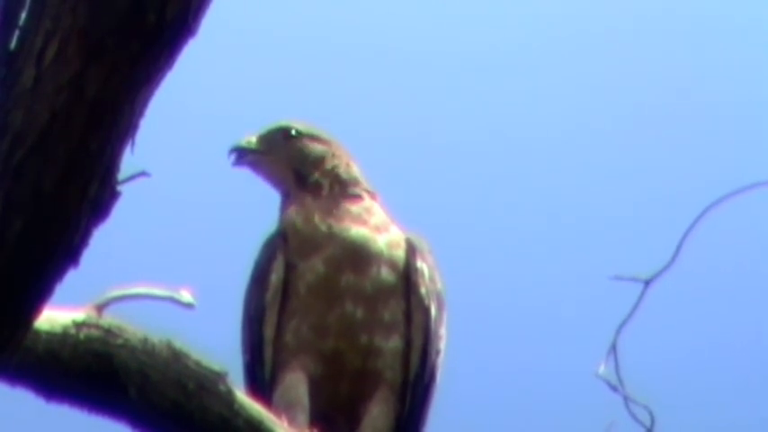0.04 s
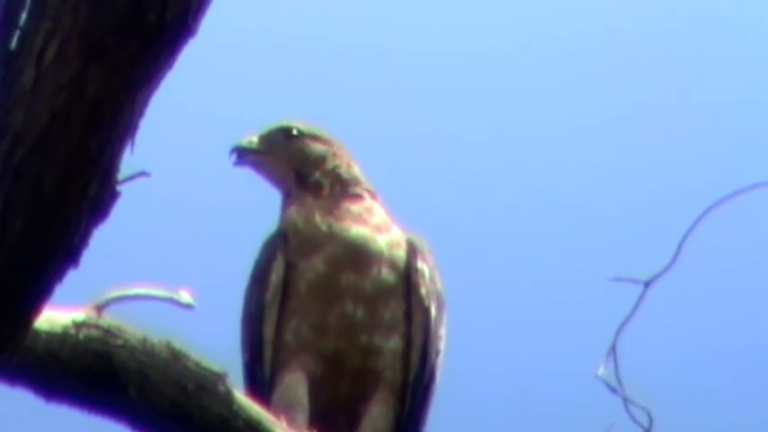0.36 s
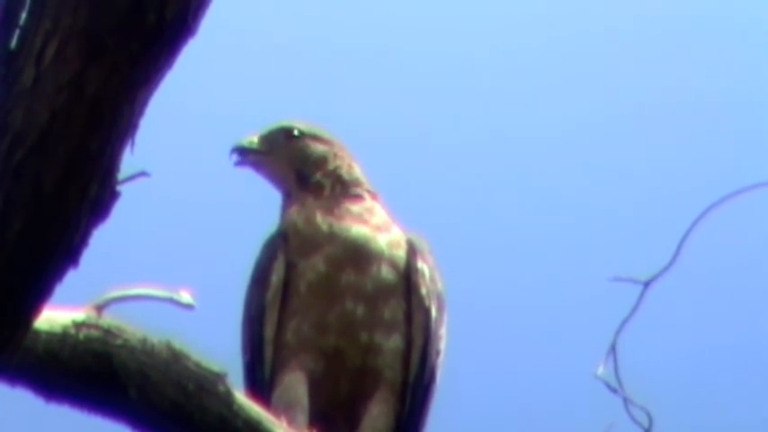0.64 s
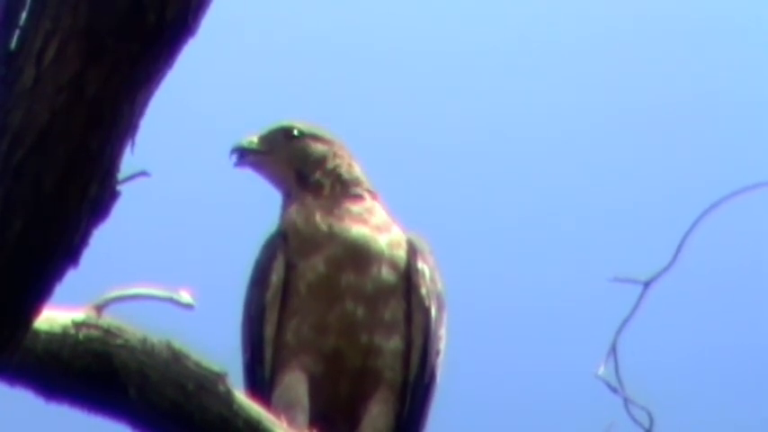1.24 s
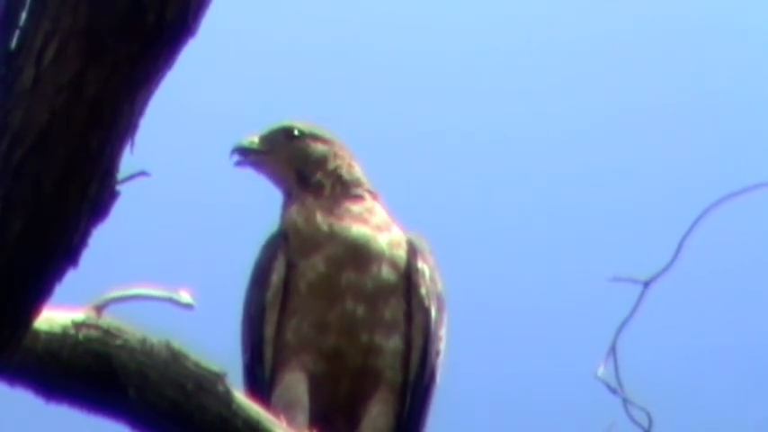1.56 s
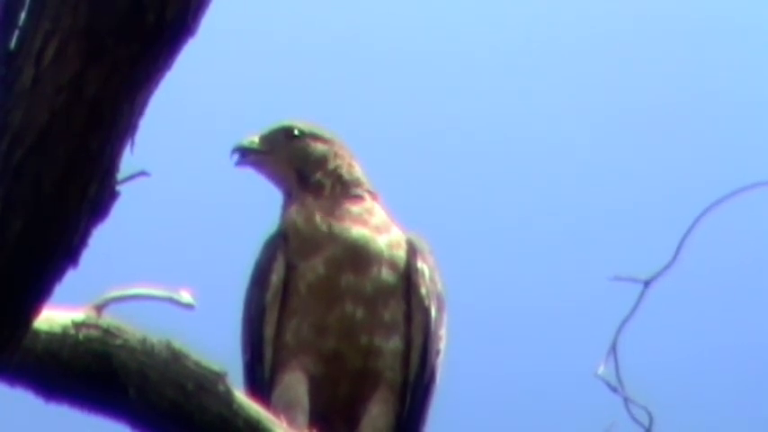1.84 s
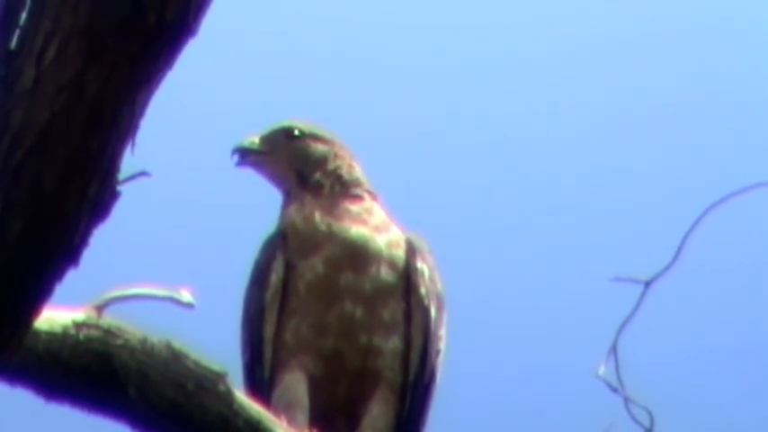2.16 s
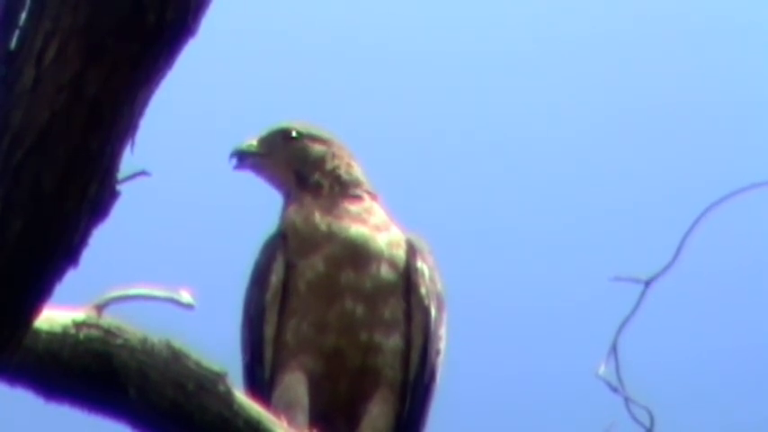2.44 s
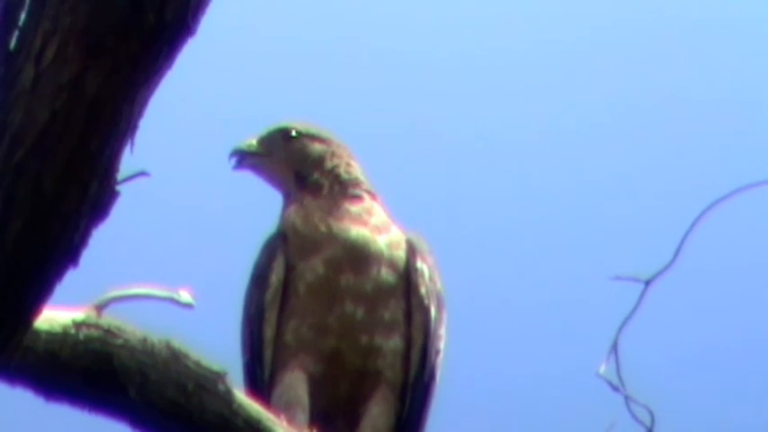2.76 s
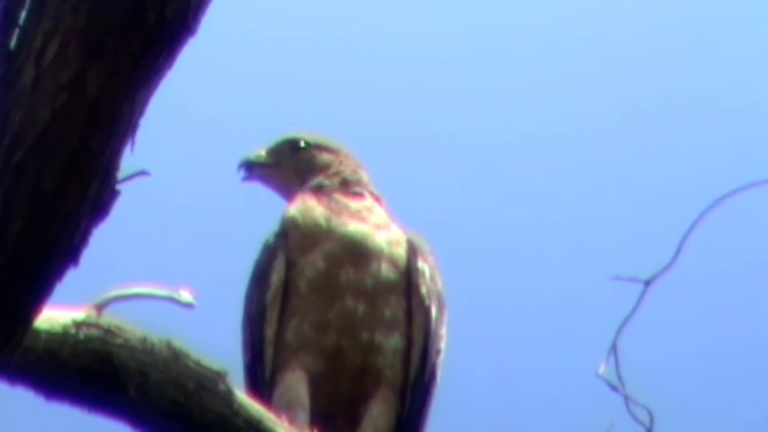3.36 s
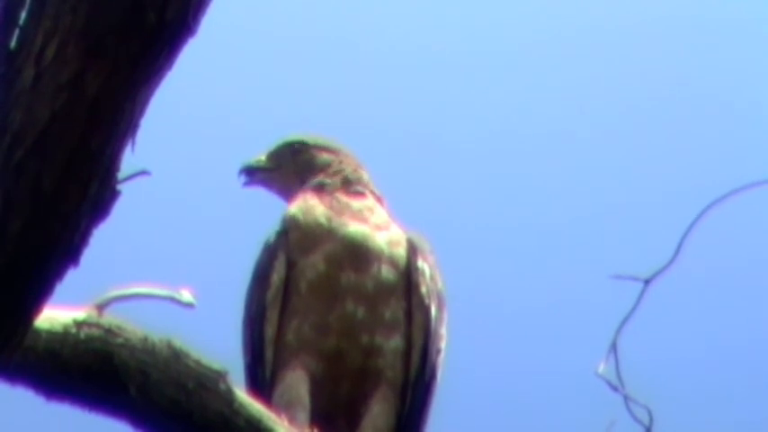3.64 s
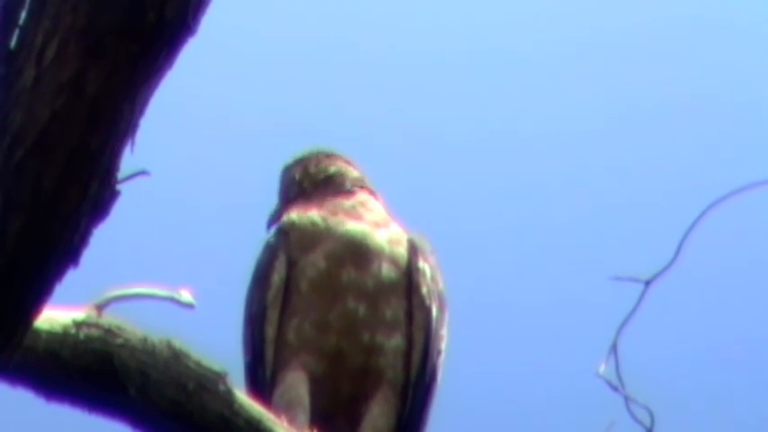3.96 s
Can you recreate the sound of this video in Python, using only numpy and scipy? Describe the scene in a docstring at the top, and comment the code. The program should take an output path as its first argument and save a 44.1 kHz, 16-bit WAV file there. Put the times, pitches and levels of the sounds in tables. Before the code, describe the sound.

Insects hiss high and steady throughout, with a thin cricket trill and low distant rumble. In the first half second a bird gives a rising whistle, with a thin buzzing one above it. Faint calls echo among the trees. From about 2 to 3 seconds a bird repeats six very high falling chirps. Something dry crackles close by just before 3 seconds, and two more chirps come near 4.

```python
"""Summer woodland. All along, insects hiss high up and one cricket trills over a low, distant rumble.
At the start a bird draws a long rising whistle, with a thin buzzing one far above it, and other birds
begin to call far off among the echoing trees. From about two seconds a bird repeats a very high falling
chirp. Near three seconds something dry crackles close by, and two more chirps come just before the end."""
import sys
import numpy as np
from scipy import signal
from scipy.io import wavfile

SR = 44100
rng = np.random.default_rng(int(sys.argv[2]) if len(sys.argv) > 2 else 0)


def bounce(signal):
    """Save signal as a 16-bit WAV file at the path given by the first command-line argument."""
    frames = np.transpose(np.atleast_2d(signal))
    limited = np.clip(frames, -1, 1)
    pcm = np.round(limited * 32767).astype(np.int16)
    wavfile.write(sys.argv[1], SR, pcm)


N = 176400
TIME = np.arange(N) / SR


def from_db(db):
    """Turn decibels into a number to multiply a sound by."""
    return 10 ** (np.asarray(db) / 20)


def rms_one(x):
    """Scale a sound so that its average power is 1."""
    return x / np.sqrt(np.mean(x ** 2) + 1e-20)


def pan(db):
    """Left and right gains that make the left side louder by db."""
    return from_db(np.array([[db], [-db]]) / 2)


def in_time(rows):
    """Join a table's rows by straight lines: one curve for each column after the time."""
    times, *columns = np.transpose(rows)
    return [np.interp(TIME, times, column) for column in columns]


def at_hz(points, hz):
    """Read a table at one frequency, with all octaves equally wide."""
    freqs, values = np.transpose(points)
    return np.interp(np.log(hz), np.log(freqs), values)


def drift(rate_hz):
    """A smooth random wobble of typical size 1; a higher rate wobbles faster."""
    r = np.exp(-2 * np.pi * rate_hz / SR)
    return rms_one(signal.lfilter([1], [1, -2 * r, r * r], rng.standard_normal(N + SR))[SR:])


def stereo(pair, alike):
    """Mix two noises into left and right: alike is 0 for unrelated sides, 1 for equal ones."""
    alike = np.clip(alike, -1, 1)
    return np.sqrt(1 + alike) * pair[0] + np.sqrt(1 - alike) * pair[1] * np.array([[1], [-1]])


def resonant_noise(hz, width_hz):
    """Two unrelated noises, each passed twice through a filter that rings at one pitch."""
    r = np.exp(-np.pi * width_hz / SR)
    section = [1 - r, 0, r - 1, 1, -2 * r * np.cos(2 * np.pi * hz / SR), r * r]
    return rms_one(signal.sosfilt([section, section], rng.standard_normal((2, N + SR)))[:, SR:])


def banded_noise(spectrum, likeness, flicker_db):
    """Stereo noise in half-octave bands, each with its own level and flicker."""
    edges = 20 * 2 ** np.arange(0, 10.1, .5)
    white = rng.standard_normal((2, 2, N))
    out = 0
    for k, (low, high) in enumerate(zip(edges, edges[1:])):
        pair = signal.sosfilt(signal.butter(2, [low, high], "band", fs=SR, output="sos"), white[k % 2])
        hz = np.sqrt(low * high)
        gain = from_db(at_hz(spectrum, hz) + flicker_db * drift(5))
        out = out + gain * stereo(pair, at_hz(likeness, hz))
    return rms_one(out)


def woods(x, echo_db, alike):
    """A sound plus quick echoes off nearby leaves and a dying cloud of echoes from the trunks."""
    t = TIME[:SR]
    first_echo_s, die_away_s, leaf_decay_s = 0.011, 0.94, 0.0069
    trunks = from_db(-60 * t / die_away_s) * (t > first_echo_s)
    leaves = from_db(7.5) * np.exp(-t / leaf_decay_s)
    echoes = stereo(rng.standard_normal((2, SR)), alike) * (trunks + leaves)
    echoes /= np.sqrt(np.sum(echoes ** 2) / 2)
    return x + from_db(echo_db) * signal.fftconvolve(x[None], echoes, axes=1)[:, :N]


def tone(hz):
    """A pure tone of power 1 that follows a pitch curve."""
    return np.sqrt(2) * np.sin(2 * np.pi * np.cumsum(hz) / SR)


def note(start, length, from_hz, to_hz, db, quaver, bend=1, growth=0):
    """One sliding bird note. A bend above 1 delays the slide; growth above 0 builds up the quaver."""
    attack_s, release_s = 0.014, 0.004
    span = (TIME >= start) & (TIME < start + length)
    t = TIME[span] - start
    slide_hz = from_hz + (to_hz - from_hz) * (t / length) ** bend
    hz = slide_hz * (1 + quaver[span] * (t / length) ** growth)
    fade = np.minimum(t / attack_s, 1) * np.minimum((length - t) / release_s, 1)
    out = np.zeros(N)
    out[span] = from_db(db) * tone(hz) * fade
    return out


def pulsing(per_s, depth, unsteady):
    """The slightly uneven throb in loudness that wing strokes make."""
    rate = per_s * (1 + unsteady * drift(9.48))
    return 1 + depth * np.sin(2 * np.pi * np.cumsum(rate) / SR)


def background():
    """Distant rumble and faint air, a few wavering hums and a dull drone that swells."""
    # tone colour of the rumble and air: f/Hz, relative level/dB
    air_colour = [(20, -2), (45, -4.5), (85, 2), (125, -5), (190, 0), (300, -6), (450, -8), (1000, -14),
                  (2500, -15.5), (5500, -17), (11000, -23), (16000, -34.5)]
    # how alike left and right are: f/Hz, likeness (0 to 1)
    likeness = [(60, 0.97), (150, 0.98), (260, 0.84), (500, 0.05), (1200, 0.067), (3000, 0.21),
                (12000, 0.93)]
    # faint far-off hums: f/Hz, level/dB, width/Hz
    hum_bands = [(84, -71.5, 9), (162.4, -61.5, 7.2), (722, -89.5, 30), (1257.5, -74, 11)]
    # loudness of the far-off drone: t/s, level/dB
    drone_swell = [(0, -71), (1, -67.5), (2.3, -60), (3, -61), (4, -61)]
    hums = sum(from_db(db) * resonant_noise(hz, width_hz)[0] for hz, db, width_hz in hum_bands)
    drone = rms_one(stereo(resonant_noise(hz=249, width_hz=116), alike=1.0))
    air = from_db(-52.5) * banded_noise(air_colour, likeness, flicker_db=1.0)
    return air + hums + from_db(in_time(drone_swell)[0]) * drone


def insects():
    """The rasping wings of many insects blend into a few throbbing bands of hiss."""
    # insect groups: f/Hz, width/Hz, level before the swell/dB, pulse rate/Hz, left over right/dB
    groups = [(7170, 520, -51, 56, -1), (7612, 500, -51, 97, -2), (7700, 84, -59, 41, 3),
              (8970, 1060, -57, 70, -1), (14600, 1500, -64, 90, 0)]
    # swell of the whole chorus: t/s, added level/dB
    swell = [(0, 1), (1.3, -.5), (2.3, 2.5), (3.3, 0.5), (4, 0.5)]
    chorus = 0
    for hz, width_hz, db, per_s, pan_db in groups:
        hiss = stereo(resonant_noise(hz, width_hz), alike=0.86)
        rasp = rms_one(hiss * pulsing(per_s, depth=0.16, unsteady=.15))
        chorus = chorus + rasp * pan(pan_db) * from_db(db + 0.1 * drift(8))
    return chorus * from_db(in_time(swell)[0])


def cricket():
    """One cricket's wing strokes make a thin, pulsing tone below the chorus."""
    # loudness of the trill: t/s, level/dB
    loudness = [(0, -65), (.55, -65), (.75, -62.5), (1.35, -62.5), (1.7, -64), (2.1, -60.5), (2.4, -60),
                (2.8, -62.5), (3.35, -61), (4, -64)]
    pitch_hz, waver_hz = 4845, 30.3
    trill = tone(pitch_hz + waver_hz * drift(60)) * pulsing(per_s=29, depth=0.37, unsteady=0.184)
    echoing = rms_one(woods(trill, echo_db=2.5, alike=0.91))
    return from_db(in_time(loudness)[0]) * pan(3) * echoing


def rising_whistle():
    """A bird's long rising whistle, which gets brighter as it gets louder."""
    # path of the whistle: t/s, f/Hz, level/dB
    path = [(0, 1500, -64), (.06, 1597, -58.5), (.13, 1705, -58), (.2, 1856, -52.5), (.27, 1917, -54),
            (.35, 1928, -55.5), (.47, 1926, -55), (.56, 1893, -61), (.6, 1890, -82)]
    # the tones in it: multiple of the pitch, added level/dB
    partials = [(1, -10), (2, -0.5), (3, -10)]
    hz, db = in_time(path)
    hz = hz * (1 + .011 * drift(180))
    dulling_db = 0.36 * (db - db.max())  # only the top tone loses this much in quiet moments
    voice = 0
    for multiple, partial_db in partials:
        voice = voice + from_db(db + partial_db + dulling_db * (multiple > 2)) * tone(multiple * hz)
    return woods(voice * (TIME < path[-1][0]), echo_db=-2, alike=0.65)


def thin_whistle():
    """A very high, level whistle that buzzes because its pitch shakes quickly."""
    # loudness of the whistle: t/s, level/dB
    loudness = [(0, -66), (.06, -57.5), (.22, -59.5), (.255, -48.5), (.32, -51.5), (.4, -61), (.5, -64),
                (.54, -72), (.62, -88)]
    pitch_hz, waver_hz, shake_hz, shakes_per_s = 11540, 27, 170, 285
    buzz = shake_hz * np.sin(2 * np.pi * shakes_per_s * TIME)
    voice = from_db(in_time(loudness)[0]) * tone(pitch_hz + buzz + waver_hz * drift(120))
    return woods(voice * (TIME < loudness[-1][0]), echo_db=-7, alike=0.26)


def far_birds():
    """Soft pips and buzzy chips from deep among the trees, with about as much echo as direct sound."""
    # bird notes: t/s, length/s, start f/Hz, end f/Hz, relative level/dB, quaver (share of the pitch)
    calls = [(0.026, 0.054, 6630, 6210, -53, 0.08), (0.117, 0.089, 2000, 2900, -61.5, 0.096),
             (0.068, .35, 2895, 2940, -64, 0.01), (0.593, 0.068, 4380, 4565, -51.5, .012),
             (0.61, 0.035, 4230, 3725, -50, 0.064), (0.836, 0.032, 6220, 5750, -51.5, 0.099),
             (0.916, 0.062, 3100, 3015, -59, 0.038), (0.986, .07, 3170, 3470, -64, 0.045),
             (1.07, 0.086, 1740, 1707, -69, .005), (1.672, 0.035, 2020, 1993, -55.5, .006),
             (1.75, .04, 1960, 1960, -65, .006), (1.889, 0.03, 2020, 2006, -54.5, 0.0066),
             (1.955, 0.037, 2044, 2020, -58, 0.0075), (2.022, 0.046, 2070, 2050, -62, .008),
             (1.689, 0.051, 5640, 6040, -48.5, 0.072), (1.8, 0.092, 5960, 5680, -57, 0.083),
             (1.96, 0.0735, 5760, 6240, -50, 0.081), (2.395, 0.047, 2514, 2478, -61.5, 0.021),
             (2.43, 0.067, 1986, 2190, -58.5, 0.028), (2.719, 0.036, 2096, 1860, -54, 0.028),
             (3.288, 0.34, 3550, 3700, -61, 0.13), (3.795, 0.068, 1746, 1947, -60, 0.031)]
    quaver = drift(345)
    song = sum(note(start, length, from_hz, to_hz, db, rough * quaver)
               for start, length, from_hz, to_hz, db, rough in calls)
    return pan(-1.5) * woods(from_db(-1.5) * song, echo_db=0, alike=0.74)


def chirping_bird():
    """Each of this bird's chirps hangs near its top pitch, then drops and turns raspy."""
    # high falling chirps: t/s, length/s, start f/Hz, end f/Hz, level before echoes/dB
    chirps = [(1.914, .06, 8840, 7260, -42.5), (2.106, 0.072, 8610, 7390, -41.5),
              (2.305, 0.066, 8680, 7400, -41), (2.501, 0.082, 8620, 7310, -41.5),
              (2.712, 0.074, 8710, 7450, -40), (2.976, 0.071, 8670, 7370, -40),
              (3.82, 0.048, 8690, 7660, -47.5), (3.983, .06, 8220, 7600, -45)]
    quaver = .047 * drift(320)
    song = sum(note(*chirp, quaver, bend=1.9, growth=.9) for chirp in chirps)
    return pan(-4) * woods(song, echo_db=1.5, alike=0.87)


def ticks():
    """Two small ticks that ring and die away, one just before the crackle and one just after."""
    # ringing ticks: t/s, f/Hz, level/dB, decay time/s
    rings = [(2.841, 5750, -30, 0.0013), (3.009, 688, -45, 0.01)]
    out = 0
    for start, hz, db, decay_s in rings:
        age = np.maximum(TIME - start, 0)
        out = out + from_db(db) * np.sin(2 * np.pi * hz * age) * np.exp(-age / decay_s)
    return out


def crackle():
    """Something dry cracks in sharp, grainy bursts of noise, each with a short rustling tail."""
    # dry cracks: t/s, level/dB, decay time/s
    cracks = [(2.8584, -34.5, 0.021), (2.8728, -20.5, 0.0019), (2.879, -29.5, 0.0026),
              (2.9139, -31.5, 0.0081), (2.9195, -33, 0.0023), (2.9263, -28, 0.0024), (2.939, -29, 0.0025),
              (2.942, -35, 0.0025), (2.9477, -30, 0.0018), (2.9495, -19.5, 0.0023), (2.998, -44.5, 0.0073)]
    # pitches at which the cracking thing rings: f/Hz, width/Hz, relative level/dB
    ring_bands = [(725, 170, -22.5), (1114, 190, -17.5), (4135, 210, -15.5)]
    # tone colour of the cracks: f/Hz, relative level/dB
    colour = [(60, -29), (250, -12), (500, -1.5), (1000, -5.5), (1700, 1.5), (3000, -2), (4300, 0.5),
              (6000, 2.5), (8600, 4), (12000, -3.5), (16000, -7)]
    tail_db, tail_s, grain_db = -17, 0.029, 2.5
    power = 0
    for start, db, decay_s in cracks:
        age = np.maximum(TIME - start, 0)
        fade = np.exp(-age / decay_s) + from_db(tail_db) * np.exp(-age / tail_s)
        power = power + (TIME > start) * (from_db(db) * fade) ** 2
    rings = sum(from_db(db) * stereo(resonant_noise(hz, width_hz), alike=0.97)
                for hz, width_hz, db in ring_bands)
    body = banded_noise(colour, likeness=[(500, 0.6), (5000, 0.9)], flicker_db=-0.5) + rings
    grainy = rms_one(body * from_db(grain_db * drift(1050)))
    return np.sqrt(power) * grainy


def scene():
    """Everything heard from under the trees."""
    steady = background() + insects() + cricket()
    birds = rising_whistle() + thin_whistle() + far_birds() + chirping_bird()
    return steady + birds + pan(-4) * (ticks() + crackle())


def record(dry):
    """A steep filter cuts off the very highest treble."""
    cutoff_hz = 15800
    return signal.sosfilt(signal.ellip(12, .1, 70, cutoff_hz, fs=SR, output="sos"), dry)


dry = scene()
out = record(dry)
bounce(out)
```